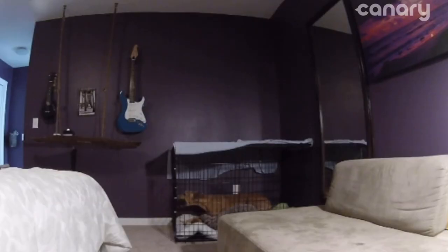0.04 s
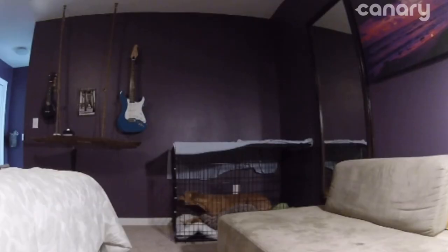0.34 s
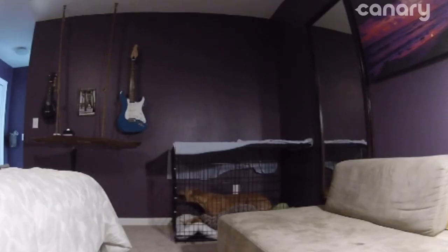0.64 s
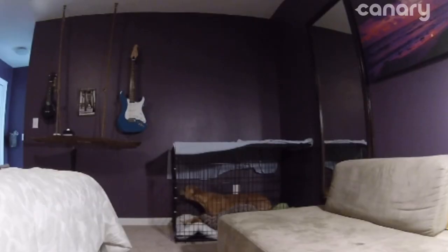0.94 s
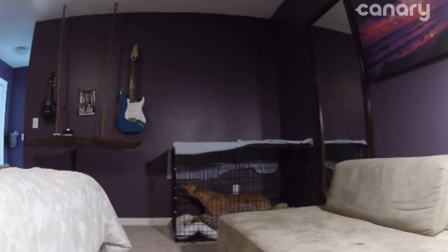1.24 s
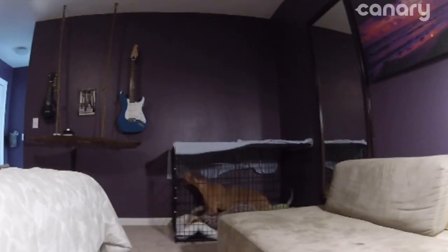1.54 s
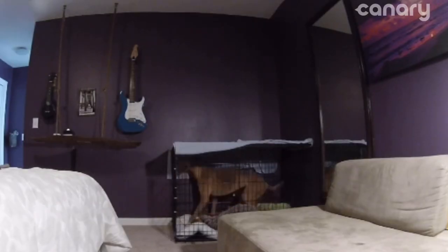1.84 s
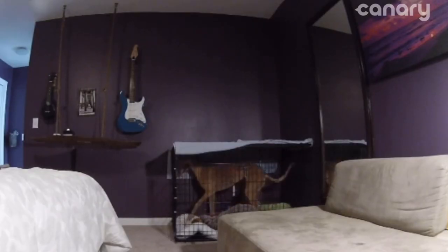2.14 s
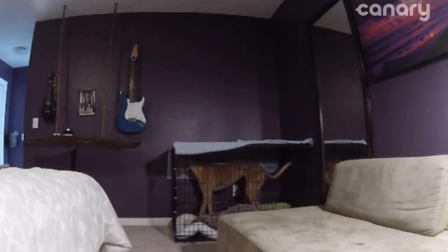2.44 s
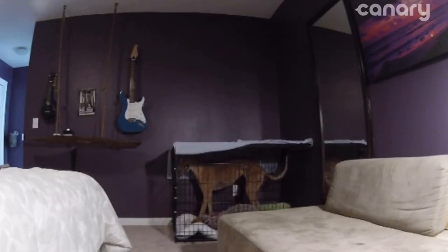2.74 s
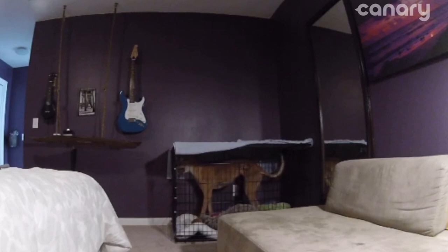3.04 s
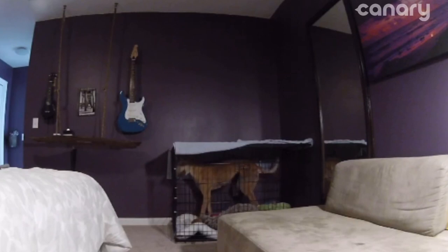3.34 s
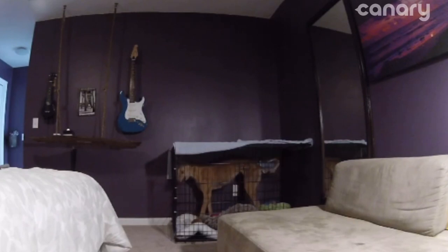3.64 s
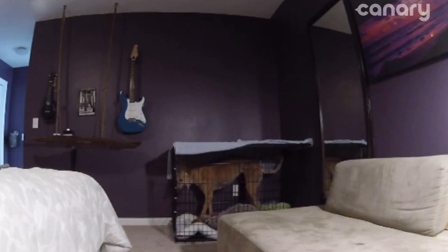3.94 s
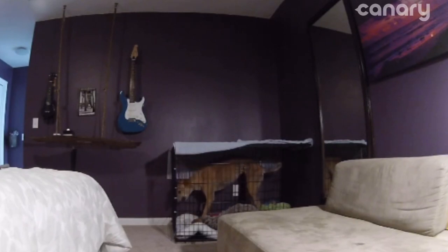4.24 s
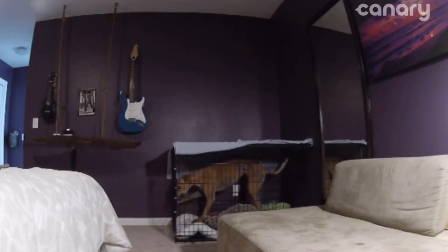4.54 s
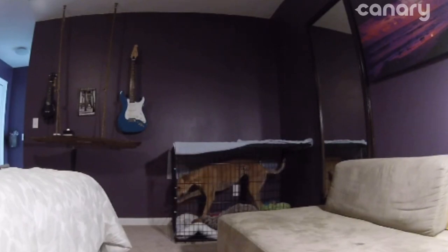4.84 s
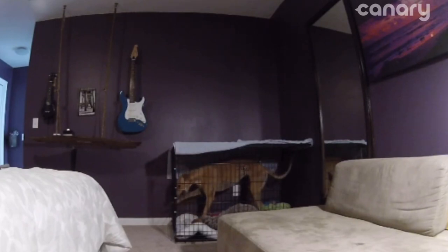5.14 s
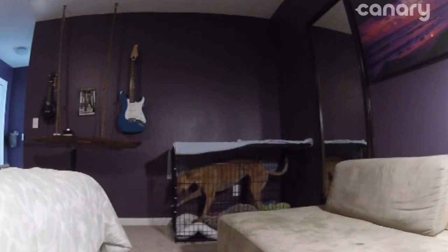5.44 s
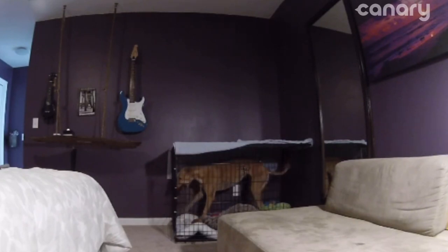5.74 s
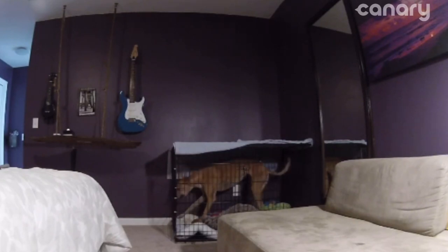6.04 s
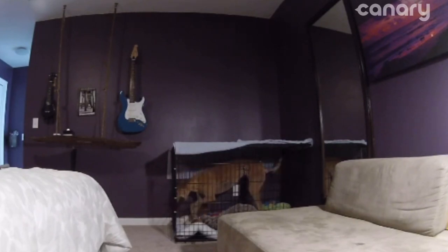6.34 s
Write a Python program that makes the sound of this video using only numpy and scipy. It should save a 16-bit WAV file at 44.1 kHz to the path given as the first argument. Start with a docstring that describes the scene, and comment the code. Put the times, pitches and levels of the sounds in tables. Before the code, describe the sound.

A dog whines, yelps and moans in a small quiet room, its high wavering cries turning hoarse and growly.

```python
"""A small carpeted bedroom, the microphone a few metres from a dog shut in a wire crate. The dog whines, yelps
and moans, its vocal folds sliding between a clean tone, period doubling and a hoarse rasp. Thin nasal whistles
lead into the cries, and faint low thumps fall, several at the start of a yelp. The room rings briefly after
each cry, over a very quiet background; fast gain control evens the peaks."""
import sys
import numpy as np
from scipy import signal
from scipy.fft import rfft, irfft, next_fast_len
from scipy.io import wavfile
from scipy.ndimage import uniform_filter1d

SR = 44100
rng = np.random.default_rng(int(sys.argv[2]) if len(sys.argv) > 2 else 0)


def persist_wave(psi):
    """Save psi, clipped to +-1, as 16-bit WAV."""
    counts = np.round(np.clip(psi, -1, 1) * 32767).astype(np.int16)
    wavfile.write(sys.argv[1], SR, np.atleast_2d(counts).T)


N = 282240  # 6.4 s


def gain_of(db):
    """Decibels to amplitude."""
    return 10 ** (np.asarray(db) / 20)


def unit_rms(x):
    """Scales to rms 1."""
    return x / np.sqrt(np.mean(abs(x) ** 2) + 1e-20)


def curve_at(points, hz):
    """Joins (frequency [Hz], value) points on a log-frequency axis."""
    point_hz, value = np.transpose(points)
    return np.interp(np.log(hz + 1), np.log(point_hz + 1), value)


def coloured(x, points):
    """Filters by a (frequency [Hz], gain [dB]) curve."""
    size = next_fast_len(len(x) + 4096)
    response = gain_of(curve_at(points, np.fft.rfftfreq(size, 1 / SR)))
    return irfft(rfft(x, size) * response, size)[:len(x)]


def flutter(count, hz):
    """Random motion of rms about 1, up to about hz."""
    step = SR / (8 * hz)
    size = int(count / step) + 64
    rolloff = np.sqrt(1 + (np.fft.rfftfreq(4096) * 8) ** 4)
    motion = unit_rms(irfft(rfft(rng.standard_normal(4096)) / rolloff))
    return np.interp(np.arange(count) / step, np.arange(size), np.resize(motion, size))


def wavering_phase(hz, share, rate_hz):
    """Phase of a tone whose pitch wanders by a share of itself."""
    return 2 * np.pi * np.cumsum(hz * (1 + share * flutter(len(hz), rate_hz))) / SR


def fades(t, rise_s, fall_s):
    """Soft start and end of a call."""
    ramp = np.minimum((t - t[0]) / rise_s, (t[-1] - t) / fall_s)
    return np.sin(np.pi / 2 * np.clip(ramp, 0, 1)) ** 2


def arch(start, length, turn):
    """The time axis of a call, and how far (0-1) each moment lies before and after its turn."""
    progress = np.linspace(0, 1, round(length * SR))
    turn = np.clip(turn, .05, .95)
    before = np.maximum(1 - progress / turn, 0)
    after = np.maximum((progress - turn) / (1 - turn), 0)
    return start + progress * length, before, after


def glide(start, length, turn, first_hz, turn_hz, last_hz, peak_db, ends_db):
    """Time, pitch and level of a sound that slides through one turn and is loudest there."""
    t, before, after = arch(start, length, turn)
    hz = turn_hz + (first_hz - turn_hz) * before + (last_hz - turn_hz) * after
    return t, hz, peak_db + ends_db * (before + after) ** 2


def mixed(events):
    """Lays (start [s], sound) events on one track."""
    track = np.zeros(N)
    for start, sound in events:
        part = track[max(round(start * SR), 0):][:len(sound)]
        part += sound[:len(part)]
    return track


# Four long whines from the crate, a few metres off:
# (time [s], pitch [Hz], effort [dB], octave [dB re fundamental], treble harmonics [dB re effort])
OPENING_WHINE = [(0.0, 967, -29, -15, -18), (0.028, 934, -32, -6.5, -22.5), (0.082, 918, -33, -3.5, -11.5),
                 (0.158, 975.3, -27, 4, -17), (0.196, 976.3, -30, -20, -12), (0.26, 873, -36.5, -4.5, -18),
                 (0.33, 907, -38, -6.5, -14.5), (0.396, 891.4, -27.5, -9.5, -19.5),
                 (0.472, 849, -23, -15.5, -16.5), (0.515, 837, -26, -6, -17.5), (0.535, 824, -47, 0.5, -15)]
THIN_WHINE = [(2.965, 1054, -41, -11.5, -28), (2.997, 1069, -50.5, 3.5, -26.5),
              (3.045, 939.7, -20, -25.5, -23.5), (3.075, 969, -31.5, -10, -19.5),
              (3.108, 1121, -32, 2.5, -8.5), (3.135, 947, -31, -12, -19), (3.19, 941, -39.5, -23, -17),
              (3.251, 949.7, -37, -26, -20), (3.301, 955, -38, -1.5, -8.5), (3.372, 934.2, -23.5, -23, -22),
              (3.525, 925.4, -27.5, -22, -27.5), (3.633, 873.3, -42, -3, -5),
              (3.681, 882, -30, -10.5, -22.5), (3.727, 899.8, -28, -9.5, -26.5),
              (3.778, 900, -39.5, -18, -13)]
SINKING_WHINE = [(4.14, 857, -35.5, -15, -22.5), (4.169, 898.7, -28.5, -16.5, -24),
                 (4.22, 946.7, -25, -11.5, -21.5), (4.285, 862, -36.5, 7.5, -21),
                 (4.333, 852.6, -32.5, -4, -13.5), (4.39, 883.2, -26, 0, -23.5),
                 (4.42, 873, -24, -0.5, -22), (4.447, 826, -19, -24.5, -27.5),
                 (4.51, 829, -24.5, -21.5, -28), (4.555, 832.4, -26.5, -10.5, -22.5),
                 (4.629, 823.8, -36.5, -11, -14.5), (4.729, 782, -34.5, 2.5, -17),
                 (4.785, 770.3, -32.5, -6, -13.5), (4.81, 700.3, -33, -7.5, -16.5),
                 (4.845, 735.2, -35, -10.5, -15), (4.88, 690, -37, -8, -13.5),
                 (4.93, 737.5, -37.5, -10, -14.5), (4.975, 717.4, -34, -11.5, -18),
                 (5.005, 690.6, -36, -18, -20.5), (5.04, 720, -32.5, -28, -13.5)]
CLOSING_MOAN = [(5.33, 735.8, -29, -20, -29), (5.39, 742, -38.5, 6, -28), (5.451, 720, -34.5, -18, -26),
                (5.5, 755.5, -30, -13.5, -20), (5.535, 793.6, -29.5, -11, -13.5),
                (5.569, 839, -34.5, -4.5, -13.5), (5.62, 805, -31.5, -21.5, -18.5),
                (5.655, 746, -31, -9, -19.5), (5.727, 751, -18.5, -15, -28),
                (5.763, 737.4, -28.5, -14, -27.5), (5.8, 847, -37, -15, -13.5),
                (5.921, 852.3, -32, -21.5, -25), (6.01, 843.6, -39.5, -10, -14),
                (6.118, 795.3, -35, 0.5, -18), (6.25, 767, -40, -6.5, -9), (6.342, 735, -49.5, -43, -21)]
# The nearly shut mouth that hollows them: (frequency [Hz], gain [dB])
SHUT_MOUTH = [(470, -2.5), (800, -1), (2700, 1.5), (3000, 0), (3550, -5), (4300, 3.5), (5200, -2),
              (6500, -4.5), (9000, -3.5), (12000, -5)]


def whine(rows, drop_share=.24, drop_s=.036, flare_db=2, boost_db=2):
    """A long, wavering cry; as it gives out, the pitch drops and the overtones flare."""
    times, *columns = np.transpose(rows)
    t = np.arange(times[0], times[-1], 1 / SR)
    hz, effort_db, octave_db, treble_db = [
        uniform_filter1d(np.interp(t, times, column), size=400, mode="nearest") for column in columns]
    giving_out = np.maximum(1 - (t[-1] - t) / drop_s, 0)
    hz = hz * (1 - drop_share * giving_out)
    lift_db = flare_db * giving_out
    voice = cry(t, hz, effort_db, octave_db + lift_db, treble_db + lift_db, third_db=-.5)
    return t[0], gain_of(boost_db) * coloured(voice, SHUT_MOUTH)


# Short yelps and whimpers between the whines: (time [s], length [s], place of the top [0-1],
# first pitch [Hz], top pitch [Hz], last pitch [Hz], attack [s], effort [dB], fade [dB],
# octave [dB re fundamental], treble [dB re effort], overtone change as the mouth closes [dB])
YELPS = [(.706, 0.2, 0.4, 694.5, 904.5, 650, 0.0099, -19.5, -21.5, -1.5, -22, -1),
         (0.965, 0.19, 0.49, 775, 823, 645.5, 0.09, -23.5, -15.5, -3, -26.5, 0.5),
         (1.328, 0.125, 0.4, 693, 852.8, 640, 0.039, -12.5, -26, 1.5, -22, 1.5),
         (1.737, 0.053, 0.12, 730, 690.5, 525, 0.0072, -41, -4.5, 1.5, -8, -5.5),
         (1.796, 0.057, 0.42, 587, 646, 547, 0.0073, -49, -8, 2.5, -7, 8),
         (1.996, 0.042, 0.5, 332, 547.6, 490, 0.015, -44, 6, -2.5, -16, -1),
         (2.034, 0.04, 0.15, 482, 466, 395, 0.0092, -38.5, -5.5, -8.5, -17, -5),
         (2.349, 0.066, 0.22, 618, 671, 571, 0.032, -35.5, -7, 0.5, -9, -4.5),
         (2.49, 0.081, 0.12, 753, 815, 692, 0.018, -31.5, -8, -7, -9.5, -4.5),
         (2.81, 0.098, 0.81, 745, 965.6, 974, 0.018, -21.5, -2.5, -1.5, -13, -32.5),
         (3.764, 0.037, 0.2, 724, 702, 624, 0.0071, -38.5, -7.5, -9.5, -15.5, -1),
         (3.929, 0.0285, 0.95, 679, 786, 795, 0.024, -24, 7, -4.5, -20, 0.5),
         (3.951, 0.13, 0.37, 877, 997.3, 832, 0.007, -21.5, -18, -5.5, -22, -11.5),
         (4.091, 0.03, 0, 914, 927, 844, 0.0045, -36, -1, -17, -24.5, -3.5),
         (5.212, 0.031, 0.98, 658, 762, 765, 0.014, -22, 2.5, -9.5, -24, 7.5),
         (5.233, 0.092, 0.65, 816, 975, 759.1, 0.005, -24.5, -3.5, -6, -22.5, -1)]
# The bite of a loud yelp as the mouth snaps open: (time [s], overtone flare [dB])
BITES = [(0.729, 5), (1.342, -3), (2.838, 4), (3.956, 9.5), (5.24, 13.5)]


def yelp(start, length, top, first_hz, top_hz, last_hz, attack_s, effort_db, fade_db,
         octave_db, treble_db, closing_db, swell_from_db=-15, bite_s=.0039):
    """A short cry on one arch of pitch; the effort swells and the closing mouth shades the overtones."""
    t, before, after = arch(start, length, top)
    hz = top_hz + (first_hz - top_hz) * before ** 2.5 + (last_hz - top_hz) * after ** 1.7
    age = t - start
    envelope_db = swell_from_db * np.maximum(1 - age / attack_s, 0) + fade_db * (age / length) ** 2
    mouth_db = closing_db * np.sin(np.pi / 2 * age / length) ** 2
    bite_db = sum(db * np.exp(-((t - time) / bite_s) ** 2) for time, db in BITES)
    return start, cry(t, hz, effort_db + envelope_db + .27 * bite_db,
                      octave_db + mouth_db + .45 * bite_db, treble_db + mouth_db + bite_db, third_db=-2)


def cry(t, hz, effort_db, octave_db, treble_db, third_db):
    """The voice behind whines and yelps: folds swinging evenly, in strong-weak pairs or chaotically."""
    count = len(t)
    half_db, upper_half_db, rough = voice_breaks(t, hz)
    # a slight quaver and tremor always; lurches and jitter when hoarse
    quaver = .003 * flutter(count, 22) + .003 * flutter(count, 51.87)
    lurch = .02275 * flutter(count, 25) + .036 * flutter(count, 150)
    hz = hz * (1 + quaver + rough * lurch)
    phase = 2 * np.pi * np.cumsum(hz) / SR
    # the fundamental shares the effort with the line at 1.5 x pitch and the octave
    base_db = -10 * np.log10(1 + gain_of(half_db) ** 2 + gain_of(octave_db) ** 2)
    doubling_db = np.minimum(half_db - np.maximum(octave_db, -6), 0)
    folds = low_lines(phase, hz, rough, base_db, half_db)
    folds += overtones(phase, hz, rough, base_db + octave_db, treble_db,
                       doubling_db, base_db + upper_half_db, third_db)
    folds *= throb(phase, rough)
    voice = np.sqrt(2) * folds + breath(phase, rough, effort_db, treble_db)
    return nose(gain_of(effort_db) * voice * rattle(rough), t[0]) * fades(t, .006, .012)


# Where the voice breaks into period doubling or a rasp: (from [s], to [s],
# line at 1.5 x pitch [dB re fundamental], line at 2.5 x pitch [dB re fundamental], roughness [0-1])
BREAKS = [(0, 0.13, -3.5, -5, 0.026), (0.147, 0.25, -8, -6.5, 0.34), (0.248, 0.33, -2, -22.5, 0.26),
          (0.535, 0.532, -15, -12, 0.45), (0.756, 0.84, -5.5, -3, 0.33), (1.135, 1.25, -23, -14.5, 0.43),
          (1.392, 1.4, -13, -6.5, 0.076), (1.427, 1.46, -2.5, -2, 0.45), (1.782, 1.99, -3, -1, 0.97),
          (2.016, 2.08, -13, -9.5, 0.31), (2.396, 2.39, -15, -24, 0.37), (2.861, 2.96, -12.5, -9, 0.18),
          (3.054, 3.08, 3.5, -19, 0.016), (3.08, 3.122, -16, -6.5, 0.59), (3.431, 3.494, -2.5, -18, 0),
          (3.659, 3.64, -7.5, -23, 0.006), (3.778, 3.805, -17, -15, 0.36), (3.963, 4, -0.5, -4, 0.12),
          (3.985, 4.02, -8, -12, 0.46), (4.209, 4.22, -12, -33, 0.075), (4.396, 4.3, -10, -13, 0.033),
          (4.439, 4.5, 0.5, 5.5, .08), (4.462, 4.54, 4.5, -2, 0.058), (4.562, 4.63, -1, -0.5, 0.548),
          (4.67, 4.86, 1, 1, 0.26), (4.796, 4.88, -4.5, -3, 0.73), (4.869, 4.91, -7, -3, 0.55),
          (4.931, 5, -3, -1, .8), (5.242, 5.247, -1.5, 10.5, 0.08), (5.255, 5.32, 4, -7.5, .08),
          (5.294, 5.319, -4.5, -8, 0.69), (5.516, 5.6, 3.5, 2.5, 0.35), (5.561, 5.62, 0.5, -12, 0.54),
          (5.666, 5.7, -13.5, -16.5, 0.0035), (5.782, 5.885, -1.5, -10, 0.466),
          (5.898, 6.3, -1, -23, 0.061), (5.986, 6.05, -2, -2.5, 0.755), (6.113, 6.186, 2, 0, 0.4),
          (6.217, 6.2, -8.5, -5.5, 0.75)]


def voice_breaks(t, hz, clean_db=-31, clean_rough=.013, slip_s=.022):
    """Nearly pure folds slip in and out of their breaks, and roughen where the pitch collapses."""
    clean = np.array([[clean_db], [clean_db], [clean_rough]])
    state = clean
    for start, end, *broken in BREAKS:
        inside = np.clip(1 + np.minimum(t - start, end - t) / slip_s, 0, 1)
        state = np.maximum(state, clean + inside * (np.array(broken)[:, None] - clean))
    half_db, upper_half_db, rough = state
    sinking = np.maximum(-np.gradient(np.log(hz)) * SR, 0)
    return half_db, upper_half_db, np.clip(rough + .0048 * sinking, 0, 1)


def low_lines(phase, hz, rough, base_db, half_db, trade_db=6.5):
    """The fundamental and the line at 1.5 x pitch trade level when hoarse, over a half-pitch undertone."""
    flip_db = trade_db * np.sqrt(rough) * np.tanh(flutter(len(hz), 25))
    pair = gain_of(-flip_db) * np.cos(phase) + gain_of(half_db + flip_db) * np.cos(1.5 * phase)
    # the undertone grows with roughness and fades as the voice climbs
    undertone_db = np.minimum(half_db, 6) - 21 + 17 * rough - .06 * np.maximum(hz - 860, 0)
    return gain_of(base_db) * (pair + gain_of(undertone_db) * np.cos(phase / 2))


def overtones(phase, hz, rough, octave_db, treble_db, doubling_db, upper_half_db, third_db,
              top_hz=6200, top_db_per_octave=-4.5, fading_db=5):
    """Harmonics slope from the octave to the treble; period doubling fills in the lines between them."""
    lines = np.zeros(len(hz))
    for multiple in np.arange(2, 16, .5):
        height = np.clip(((multiple - 2) * hz - 500) / 1700, 0, 1)
        line_db = (1 - height) * octave_db + height * treble_db
        if multiple == 2.5:
            line_db = upper_half_db
        elif multiple == 3:
            line_db = line_db + third_db
        elif multiple % 1:
            line_db = line_db + doubling_db - 4 * height
        rolloff_db = top_db_per_octave * np.maximum(np.log2(multiple * hz / top_hz), 0)
        # high lines swell and fade as the head moves, and fray with strain, most when hoarse
        swell_db = fading_db * height * (2 * np.tanh(flutter(len(hz), 16) / 2) - .3)
        fray = height * (.1 + 1.25 * np.sqrt(rough)) * flutter(len(hz), 200)
        line = np.cos(multiple * phase + fray + rng.uniform(0, 2 * np.pi))
        lines += gain_of(line_db + rolloff_db + swell_db) * line
    return lines


def throb(phase, rough, depth=.37, shimmer=.34):
    """Hoarse folds swell every fourth cycle, and unevenly."""
    beat = np.cos(phase / 4 + 2.04 * flutter(len(phase), 23))
    swing = 1 + 2 * rough * (depth * beat + shimmer * np.tanh(flutter(len(phase), 150)))
    return swing / np.sqrt(1 + 2 * rough ** 2 * (depth ** 2 + shimmer ** 2))


def rattle(rough, rate_hz=95.05, uneven=.3, decay_cycles=.22, depth=1.58):
    """The loudness of a hoarse voice jumps at every slap of the throat and sags before the next."""
    cycles = np.cumsum(rate_hz * (1 + uneven * flutter(len(rough), 80))) / SR
    slaps = np.exp(-(cycles % 1) / decay_cycles) * gain_of(2.7 * flutter(len(rough), 70))
    slaps = uniform_filter1d(slaps, size=30, mode="nearest")
    return 1 + depth * rough * (slaps - slaps.mean())


# Breathy hiss, and the lower rush of air in a cry: (frequency [Hz], gain [dB])
HISS = [(1500, -32), (3200, -10), (4200, -1.5), (6500, 2), (9000, -0.5), (13000, -12)]
AIR = [(300, 6.5), (700, -14), (1300, -8.5), (2200, 22), (3200, -17.5), (6000, -10), (12000, -22)]


def breath(phase, rough, effort_db, treble_db, clean_db=-36, hoarse_db=-16):
    """Air escapes in puffs through the folds; feeble or hoarse cries are airier, hiss follows the treble."""
    puffs = rng.standard_normal(len(phase)) * (1 + .5 * np.cos(phase / 2))
    feeble_db = 1.1 * np.clip(-35 - effort_db, 0, 16)
    air = gain_of(feeble_db) * unit_rms(coloured(puffs, AIR))
    hiss = gain_of(treble_db - 10) * unit_rms(coloured(puffs, HISS))
    return air * (gain_of(clean_db) + rough * gain_of(hoarse_db)) + hiss


# The nose, heard from the microphone as the dog turns its muzzle:
# (time [s], antiresonance [Hz], resonance [Hz], resonance gain [dB])
NOSE = [(0.05, 3230, 5080, 15), (0.22, 3450, 5030, 4.5), (0.36, 3650, 5330, 10.5),
        (0.501, 3180, 5350, -3.5), (0.74, 3510, 5040, 12.5), (1.03, 3040, 4950, 2), (1.37, 4048, 5250, 6),
        (2.4, 4600, 5650, -5), (2.84, 3100, 5470, 2.5), (3.25, 3350, 5740, 0.5), (3.48, 3380, 5000, 15),
        (3.7, 3270, 4170, 1), (4.161, 3840, 5457, 9.5), (4.35, 3350, 4160, 8), (4.8, 3160, 4120, -6),
        (5.4, 3530, 4720, 7), (5.75, 3490, 4480, -1), (6.3, 3150, 4270, -9)]


def nose(x, start, notch_db=-13, notch_width_hz=210, ring_width_hz=290):
    """The nose takes one moving band out of the voice and rings in another."""
    hz, t, spectrum = signal.stft(x, SR, nperseg=512)
    times, *columns = np.transpose(NOSE)
    notch_hz, ring_hz, ring_db = [np.interp(start + t, times, column) for column in columns]
    colour_db = notch_db * np.exp(-((hz[:, None] - notch_hz) / notch_width_hz) ** 2)
    colour_db += ring_db * np.exp(-((hz[:, None] - ring_hz) / ring_width_hz) ** 2)
    return signal.istft(spectrum * gain_of(colour_db), SR, nperseg=512)[1][:len(x)]


# Nasal whistles around the cries: (time [s], length [s], place of the turn [0-1], first pitch [Hz],
# turn pitch [Hz], last pitch [Hz], level [dB], octave [dB re fundamental])
WHISTLES = [(0.693, 0.051, 0.27, 2970, 2770, 2800, -37.5, 4),
            (0.882, 0.048, 0.6, 3870, 3660, 3270, -40.5, -0.5),
            (0.939, 0.067, 0.42, 2290, 2390, 2420, -42.5, 2),
            (1.076, 0.043, 0.73, 4150, 3730, 3560, -31.5, -4),
            (1.176, 0.032, 0.73, 2140, 2260, 2200, -45.5, 7),
            (1.315, 0.034, 0.38, 3010, 2730, 2824, -35, 5.5),
            (1.527, 0.074, 0.58, 2188, 2270, 2560, -42, -0.5),
            (1.571, .03, .5, 3030, 3300, 3520, -42.5, -13),
            (1.714, 0.04, 0.34, 3286, 2913, 3104, -33.5, 3.5),
            (1.737, 0.058, 0.3, 2945, 3170, 2600, -38, 6), (1.79, 0.059, 0.4, 2158, 2330, 2317, -43, 3.5),
            (2.01, 0.08, 0.44, 1993, 2065, 2006, -52.5, 13.5),
            (2.023, 0.033, 0.3, 2780, 2550, 2590, -48, 6), (2.039, .035, 0.5, 3470, 3380, 3060, -51.5, 10),
            (2.117, 0.042, 0.72, 2190, 2414, 2516, -38.5, -1.5),
            (2.166, 0.028, 0.48, 3030, 3290, 3550, -34, -18),
            (2.338, 0.047, 0.55, 3140, 3790, 3830, -33, -0.5),
            (2.375, 0.039, 0.58, 3860, 3660, 3120, -30.5, -5.5),
            (2.462, 0.039, 0.53, 2154, 2480, 2750, -43.5, 4),
            (2.499, 0.0803, 0.61, 2500, 2630, 2660, -44, 1.5),
            (2.534, .035, .6, 2800, 2890, 2880, -44.5, 3), (2.8, 0.02, 0.55, 3044, 2890, 2820, -39.5, 6.5),
            (3.758, 0.038, 0.34, 5170, 4250, 3670, -37.5, -14),
            (3.921, 0.016, 0.66, 3180, 3230, 3300, -44.5, 11.5),
            (5.016, 0.025, 0.42, 4266, 3720, 3250, -31.5, -14),
            (5.198, 0.023, 0.35, 3300, 3343, 3310, -31, -14.5)]


def whistle(row, octave_db, scratch=.39, breath_db=-14):
    """A thin, scratchy tone through the nose, often with a strong octave, in a little rush of air."""
    t, hz, level_db = glide(*row, ends_db=-11.5)
    phase = wavering_phase(hz, share=.0098, rate_hz=260)
    upper = gain_of(octave_db) * (np.sin(2 * phase) + gain_of(-14) * np.sin(3 * phase))
    tone = (np.sin(phase) + upper) * unit_rms(1 + scratch * flutter(len(t), 450))
    hiss = unit_rms(coloured(rng.standard_normal(len(t)), HISS))
    air = gain_of(breath_db) * np.hypot(1, gain_of(octave_db)) * hiss
    return t[0], gain_of(level_db) * (np.sqrt(2) * tone + air) * fades(t, .007, .008)


# Low growls under the hoarse cries: (time [s], length [s], place of the turn [0-1],
# first pitch [Hz], turn pitch [Hz], last pitch [Hz], level [dB])
GROWLS = [(4.431, 0.3, 0.62, 236.5, 203.1, 202, -31.5), (4.662, .17, 0.49, 197.4, 193.8, 184.3, -29),
          (4.79, .24, 0.7, 204.9, 222.3, 206.7, -31), (5.492, 0.12, .52, 185.9, 211.3, 218.6, -25),
          (5.776, 0.11, .4, 201.5, 185.6, 163.7, -41.5), (5.95, .29, .55, 220, 202.9, 199.6, -36)]
# Their partials: (multiple of the pitch, level [dB])
GROWL_PARTIALS = [(2, -0.5), (3, 13.5), (5, -10), (6, 4.5), (7, 1.5), (8, -5.5), (9, 5), (10, 9), (11, 9),
                  (12, -5.5)]


def growl(row, shimmer=.52):
    """A slow, unsteady second vibration of the throat."""
    t, hz, level_db = glide(*row, ends_db=-10)
    phase = wavering_phase(hz, share=.0257, rate_hz=75.1)
    buzz = sum(gain_of(db) * np.cos(k * phase + rng.uniform(0, 2 * np.pi)) for k, db in GROWL_PARTIALS)
    buzz = unit_rms(buzz * (1 + shimmer * flutter(len(t), 80)))
    return t[0], gain_of(level_db) * buzz * fades(t, .09, .0047)


# Squeals bending above the voice: (time [s], length [s], place of the turn [0-1],
# first pitch [Hz], turn pitch [Hz], last pitch [Hz], level [dB], flutter depth [0-1])
SQUEALS = [(3.077, 0.074, .55, 985, 1165, 1122, -30, 0.47),
           (3.949, .06, 0.21, 1323, 1383, 1500, -26.5, .15), (4.785, .08, .35, 1301, 1230, 1153, -33, 0.93),
           (4.912, 0.084, 0.46, 1119, 1187, 1318, -32.5, .8), (5.237, .02, 0.5, 1295, 1322, 1326, -18, .05),
           (5.25, .042, .65, 1341, 1404, 1465, -29.5, .15), (5.51, .05, .5, 1109, 1189, 1185, -27.5, 0.65),
           (5.586, .065, .5, 1259, 1216, 1144, -29.5, .4), (5.774, .14, .8, 1225, 1265, 1270, -29, 0.6),
           (5.959, 0.052, 0.7, 1275, 1269, 1240, -34.5, .35), (6.098, 0.05, .3, 1167, 1198, 1193, -28, .4)]


def squeal(row, depth, octave_db=-24):
    """The folds split and add a nearly pure second tone, fluttering in strength and phase."""
    t, hz, level_db = glide(*row, ends_db=-8)
    phase = wavering_phase(hz, share=.008, rate_hz=40)
    swing = unit_rms(1 + depth * (flutter(len(t), 75) + 1j * flutter(len(t), 75)))
    tone = (swing * (np.exp(1j * phase) + gain_of(octave_db) * np.exp(2j * phase))).real
    return t[0], np.sqrt(2) * gain_of(level_db) * tone * fades(t, .005, .011)


# Rasps as a cry is choked off or forced out: (time [s], length [s], level [dB])
RASPS = [(0.507, 0.037, -35), (2.04, 0.035, -40), (3.775, 0.028, -43), (5.236, 0.019, -33),
         (5.513, .045, -39.5), (6.071, .04, -45), (6.22, 0.079, -44)]
# Their colour: (frequency [Hz], gain [dB])
RASP_COLOUR = [(1500, -25.5), (2800, 1), (4200, -1.5), (6000, -2), (9000, -6), (13000, -14.5)]


def rasp(start, length, level_db):
    """A short, rattling rush of air through the throat."""
    t = np.arange(0, length, 1 / SR)
    puffs = rng.standard_normal(len(t)) * rattle(np.ones(len(t)))
    air = unit_rms(coloured(puffs, RASP_COLOUR))
    return start, gain_of(level_db) * air * fades(t, .006, .0095)


# Colour of throat and muzzle: (frequency [Hz], gain [dB])
THROAT = [(150, -27.5), (300, -22.5), (385, -3.5), (480, -1.5), (620, -2.5), (950, -4.5), (1060, 0),
          (1200, 1), (2150, -5.5), (2620, -10.5), (2850, -15), (3300, -10.5), (3600, -9.5), (3800, -11.5),
          (4270, -10.5), (4650, -12.5), (5070, -8), (5800, -9.5), (6600, -15.5), (8000, -24),
          (10000, -36.5), (13000, -43)]


def dog():
    """Every call leaves through the same throat and muzzle."""
    calls = [whine(rows) for rows in (OPENING_WHINE, THIN_WHINE, SINKING_WHINE, CLOSING_MOAN)]
    calls += [yelp(*row) for row in YELPS]
    calls += [whistle(row, octave_db) for *row, octave_db in WHISTLES]
    calls += [growl(row) for row in GROWLS]
    calls += [squeal(row, depth) for *row, depth in SQUEALS]
    calls += [rasp(*row) for row in RASPS]
    return coloured(mixed(calls), THROAT)


# Faint low thumps, several at the start of a yelp: (time [s], pitch [Hz], level [dB])
THUMPS = [(0.69, 54.4, -57), (1.32, 55, -53), (1.63, 198, -63), (1.821, 268, -56.5), (1.998, 299, -56),
          (2.81, 53.7, -63), (2.88, 150, -66), (3.119, 175, -57.5)]


def thump(start, hz, level_db, rise_s=.012):
    """A dull, soft thump: a few low, quickly damped modes."""
    t = np.arange(0, .2, 1 / SR)
    modes = sum(np.sin(2 * np.pi * (hz * ratio * t + rng.random())) for ratio in (.7, 1, 1.25))
    return start, gain_of(level_db) * modes * t / rise_s * np.exp(-t / rise_s)


# Ring of the carpeted bedroom: (frequency [Hz], time to fall 60 dB [s])
ROOM_DECAY = [(300, 0.32), (800, 0.49), (2000, 0.42), (5000, 0.51), (9000, 0.17)]
# First reflections off crate, floor and walls, at the microphone: (delay [s], level [dB])
REFLECTIONS = [(.0012, -28), (.0031, -15), (.0052, -26), (.0087, -19), (.0134, -15), (.019, -11)]


def bedroom(x, tail_db=-8):
    """A few metres of room: the direct sound, close reflections and a dense tail."""
    slots = np.arange(300, SR - 20, 20)
    taps = np.zeros(SR)
    taps[slots + rng.integers(0, 20, len(slots))] = rng.choice([-1., 1.], len(slots))
    hz, t, spectrum = signal.stft(taps, SR, nperseg=256)
    decay = gain_of(-60 * t / curve_at(ROOM_DECAY, hz)[:, None])
    tail = signal.istft(spectrum * decay, SR, nperseg=256)[1]
    response = gain_of(tail_db) * tail / np.linalg.norm(tail)
    response[0] += 1
    for delay, db in REFLECTIONS:
        response[round(delay * SR)] += gain_of(db)
    return signal.fftconvolve(x, response / np.linalg.norm(response))[:N]


# Faint tones in the room: (frequency [Hz], level [dB])
HUM = [(441.4, -76.5), (554.5, -77)]
# Room noise around the microphone: (frequency [Hz], relative density [dB])
ROOM_NOISE = [(20, -12.5), (50, 1), (90, -7), (200, -10), (330, -5.5), (490, -2), (700, -3.5), (1500, -4),
              (3000, -5), (6000, -24), (9000, -22.5), (13000, -37.5)]


def room_tone(noise_db=-68, waver=.65):
    """Soft noise with faint tones that waver in level."""
    t = np.arange(N) / SR
    hum = sum(gain_of(db) * (1 + waver * flutter(N, 5.1)) * np.sin(2 * np.pi * hz * t) for hz, db in HUM)
    noise = unit_rms(coloured(rng.standard_normal(N), ROOM_NOISE))
    return np.sqrt(2) * hum + gain_of(noise_db) * noise


def scene():
    """The dog and the low thumps from across the bedroom, over the room tone, in mono."""
    crate = dog() + mixed(thump(*row) for row in THUMPS)
    return (bedroom(crate) + room_tone())[None]


def record(dry, threshold_db=-28.5, squeeze=.73, recovery_db_per_s=120, makeup_db=1,
           bend_db=-11, low_cut_hz=40, edge_hz=13600):
    """The camera's microphone: fast gain control, a slightly lopsided response and a band limit."""
    x = dry[0]
    power_db = 10 * np.log10(abs(uniform_filter1d(x ** 2, size=300)) + 1e-12)
    recovery_db = np.arange(N) * recovery_db_per_s / SR
    held_db = np.maximum.accumulate(power_db + recovery_db) - recovery_db
    over_db = np.maximum(held_db - threshold_db, 0)
    x = x * gain_of(makeup_db - squeeze * uniform_filter1d(over_db, size=150))
    # the lopsided response puts faint low difference tones under the loud cries
    low_cut = signal.butter(2, low_cut_hz, "highpass", fs=SR, output="sos")
    x = x + gain_of(bend_db) * signal.sosfilt(low_cut, x ** 2)
    band_limit = signal.firwin(511, edge_hz, window=("kaiser", 9), fs=SR)
    return signal.oaconvolve(x, band_limit, "same")[None]


dry = scene()
out = record(dry)
persist_wave(out)
```